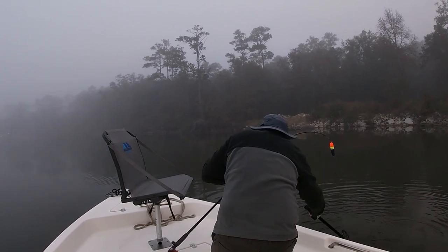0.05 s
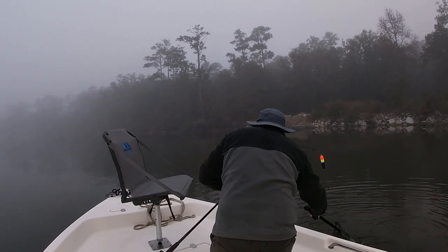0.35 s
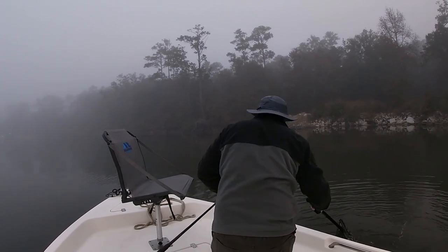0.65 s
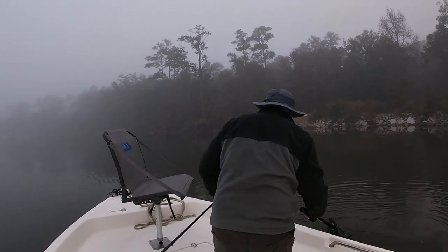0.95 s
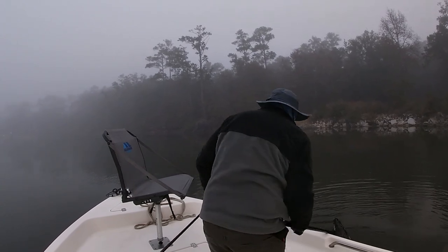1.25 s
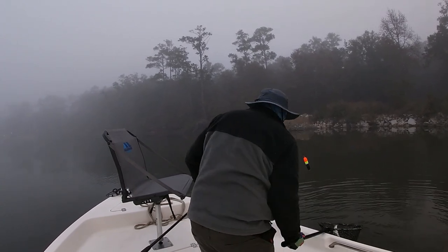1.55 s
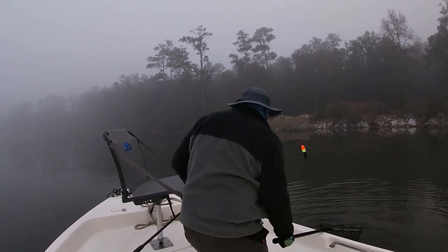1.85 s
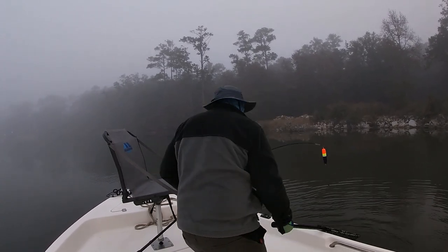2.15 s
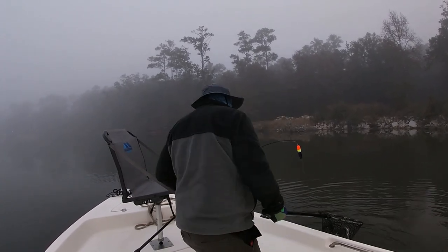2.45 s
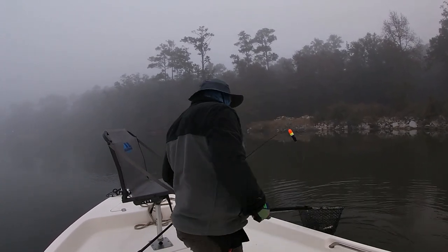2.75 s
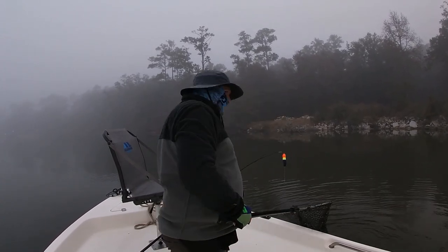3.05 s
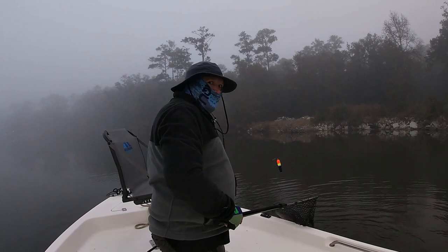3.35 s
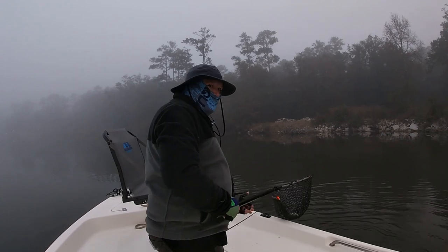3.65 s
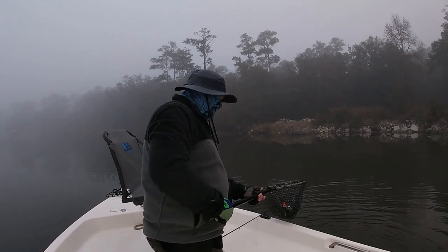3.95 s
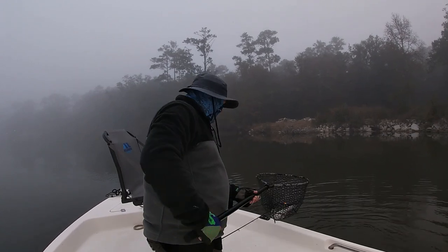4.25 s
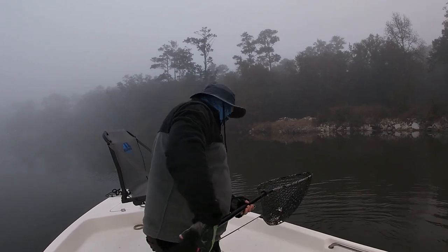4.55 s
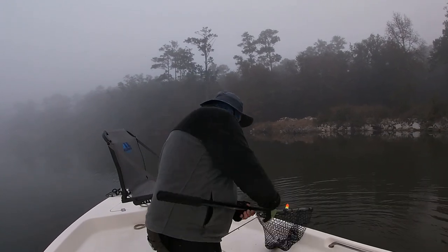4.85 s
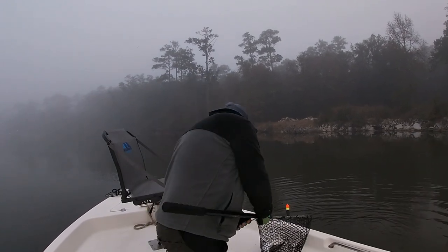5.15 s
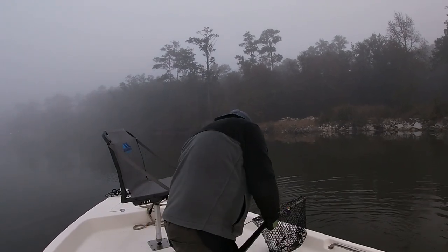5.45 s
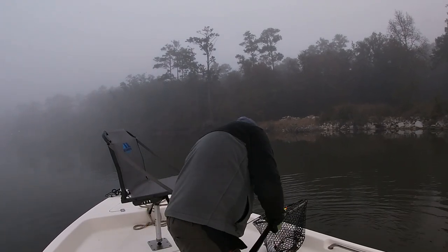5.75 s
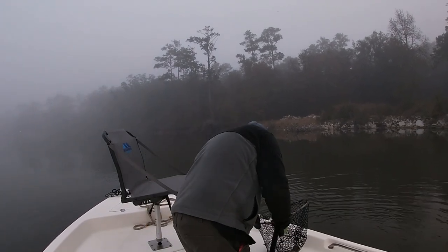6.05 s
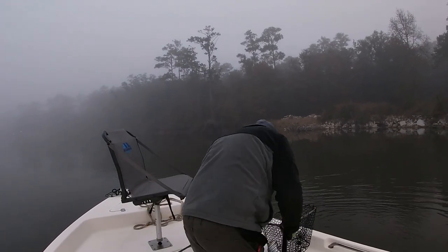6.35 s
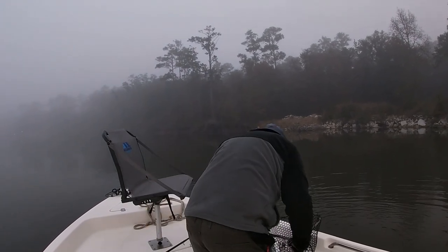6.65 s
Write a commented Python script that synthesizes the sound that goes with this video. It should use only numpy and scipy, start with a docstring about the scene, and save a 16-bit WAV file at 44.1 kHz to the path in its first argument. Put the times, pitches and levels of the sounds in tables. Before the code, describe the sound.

Quiet outdoor air, soft lapping and a faint small motor hum run throughout. At about 0.4 seconds water trickles from a lifted landing net, with bubbly plinks, one louder near 0.7, drying up soon after one second. At 1.2 gear knocks sharply on the hollow boat hull and a rubber sole squeaks. Faint drips and rustling of cloth and mesh follow, with a soft bump near 2.2 and a barely audible distant bird near 2.7. From 3.5 to 4.3 comes the loudest part: a netted fish thrashes against the hull with knocks and rumble, while net frame and tackle clack and rebound close by. Lighter clacks continue until a heavy, dull thump at 5 seconds. Sparse clicks and soft rustling follow, with two softer thumps around 6.4 and a couple of very faint bird chirps near the end.

```python
"""A netted fish thrashes against the hollow hull of a small boat, driving its modes into knocks and rumble.
Feet and gear thump the same hull; net frame and tackle clack and rebound. Earlier, as the angler lifts
the landing net, water drains from the mesh, its drops trap ringing bubbles, and late drips tick on water
and deck. A rubber sole squeaks, cloth and mesh rustle by friction, and a distant bird chirps. Under it
all are the quiet air of the river, water lapping at the boat and the hum of a small motor."""
import sys
import numpy as np
from scipy import signal
from scipy.fft import rfft, irfft
from scipy.io import wavfile

SR = 44100
rng = np.random.default_rng(int(sys.argv[2]) if len(sys.argv) > 2 else 0)


def unload_wav(signal):
    """Save mono or channel-first audio to the path in sys.argv[1] as 16-bit WAV at rate SR, clipped to [-1, 1]."""
    wavfile.write(
        sys.argv[1],
        SR,
        np.round(np.clip(np.atleast_2d(signal).T, -1, 1) * 32767).astype(np.int16),
    )


N = 305172
TIME = np.arange(N) / SR
HZ = np.fft.rfftfreq(8192, 1 / SR)


def amp(db):
    """Amplitude ratio of a level in decibels."""
    return 10 ** (np.asarray(db) / 20)


def unit_rms(x):
    """Normalisation to unit mean power."""
    return x / np.sqrt(np.mean(x ** 2) + 1e-20)


def spectrum(points, hz=HZ):
    """Interpolation on a logarithmic frequency axis."""
    f, value = np.transpose(points)
    return np.interp(np.log(hz + 1), np.log(f + 1), value)


def envelope(curve):
    """Amplitude envelope of a level curve."""
    return amp(np.interp(TIME, *np.transpose(curve)))


def gated(curve):
    """Amplitude envelope, silent outside the curve's span."""
    return envelope(curve) * (TIME >= curve[0][0]) * (TIME <= curve[-1][0])


def add(mix, onset, sound):
    """Superposition of a sound from its onset in seconds."""
    part = mix[max(round(onset * SR), 0):][:len(sound)]
    part += sound[:len(part)]


def decay(t, t60):
    """Exponential damping: 60 dB in t60 seconds."""
    return np.exp(-np.log(1000) * t / np.maximum(t60, 1e-3))


def colour(x, db):
    """Minimum-phase filter of unit energy, shaped by db over HZ."""
    log_gain = np.log(amp(np.maximum(db - db.max(), -100)))
    log_response = np.conj(signal.hilbert(np.r_[log_gain, log_gain[-2:0:-1]]))
    taps = np.fft.ifft(np.exp(log_response)).real[:len(HZ)]
    return signal.oaconvolve(x, taps / np.linalg.norm(taps))[:len(x)]


def band(centre_hz, db_per_octave2):
    """Band-pass response in dB: a parabola, flat beyond two octaves."""
    return -db_per_octave2 * np.minimum(np.log2((HZ + 1) / centre_hz) ** 2, 4)


def resonance(hz, width_hz=750):
    """Lorentzian resonance curve of height 1."""
    return 1 / (1 + (2 * (HZ - hz) / width_hz) ** 2)


def wander(rate_hz, size=N):
    """Random fluctuation: low-pass noise of unit rms."""
    f = np.fft.rfftfreq(N, 1 / SR)
    return unit_rms(irfft(rfft(rng.standard_normal(N)) / (1 + (f / rate_hz) ** 4), N))[:size]


def scattered(x, t60, db):
    """Diffuse reflection from deck and banks adds a short echo."""
    t = np.arange(SR // 2) / SR
    echo = rng.standard_normal(len(t)) * decay(t, t60)
    return x + amp(db) * signal.oaconvolve(x, echo / np.linalg.norm(echo))[:N]


def glides(notes, jitter):
    """Frequency-modulated tones; a bend under 1 glides early, over 1 late."""
    out = np.zeros(N)
    for onset, length, start_hz, end_hz, db, bend in notes:
        u = np.linspace(0, 1, int(length * SR))
        hz = (start_hz + (end_hz - start_hz) * u ** bend) * (1 + jitter * wander(900, len(u)))
        tone = np.sin(2 * np.pi * np.cumsum(hz) / SR)
        add(out, onset, amp(db) * tone * signal.windows.tukey(len(u), .5))
    return out


# Spectral density of still air: f/Hz, relative level/dB
AIR_SPECTRUM = [(12, -37.5), (20, -4.5), (53, -7.5), (134, -1), (270, -4.5), (347, -3.5), (485, -11),
                (558, -9), (624, -11.5), (923, -21), (1660, -23.5), (1960, -31), (3200, -33), (4420, -37.5),
                (6500, -38.5), (8200, -39), (10000, -49.5), (12500, -60.5), (16000, -80.5)]

def air():
    """Ambient noise: stationary, with most of its power at low frequencies."""
    return amp(-49) * colour(rng.standard_normal(N), spectrum(AIR_SPECTRUM))


# Swell of the lapping: t/s, relative level/dB
LAPPING = [(0, -43), (.8, -57), (1.9, -48.5), (2.25, -42.5), (2.7, -47.5), (3.4, -38), (4.3, -47),
           (5.25, -35.5), (5.55, -64.5), (6.2, -44), (6.92, -55)]
# Its spectrum: f/Hz, relative level/dB
LAP_SPECTRUM = [(20, -25), (50, -5), (110, 2.5), (300, -2), (450, -17), (800, -14), (2000, -35),
                (6000, -65)]

def lapping():
    """Amplitude modulation: low water noise under the hull swells as the boat rocks."""
    water = colour(rng.standard_normal(N), spectrum(LAP_SPECTRUM))
    return envelope(LAPPING) * water * amp(1.05 * wander(2.4) - 6.5)


# Upper motor tones: f/Hz, relative level/dB
MOTOR_TONES = [(140, -56), (264, -59), (322, -58), (361, -55.5), (402, -56.5), (564, -55.5), (1690, -72.5)]
# Lowest motor tone: t/s, relative level/dB
MOTOR_DRONE = [(0, -47), (2.7, -45), (3.4, -57), (6.92, -55.5)]

def motor(drone_hz=65.4):
    """A line spectrum: each tone of the small motor wavers in frequency and amplitude."""
    def tone(hz):
        phase = 2 * np.pi * np.cumsum(hz + 2.586 * wander(8.41)) / SR
        return np.sqrt(2) * np.sin(phase) * amp(2.4 * wander(10.6))
    hum = sum(amp(db) * tone(hz) for hz, db in MOTOR_TONES)
    return amp(-4) * (hum + envelope(MOTOR_DRONE) * tone(drone_hz))


# Distinct hull modes: f/Hz, relative level/dB, nominal T60/s
HULL_MODES = [(74, -3.5, 0.58), (98, 0, 0.54), (144.8, 4, 0.59), (197.2, 4.5, 0.67), (204.4, -0.5, 0.29),
              (298, -10.5, 0.63), (368.3, 2, 0.32), (405, 6, 0.16), (524, -4, 0.31), (551, 4.5, 0.24),
              (605.5, 1.5, 0.29), (672.3, 3, 0.19), (737.5, 1, 0.28), (930, 1.5, 0.28), (1015, 7, .12),
              (1105, 6, 0.11), (1264, 4, 0.13), (1542, 5, 0.19)]
# Damping of the dense modes: f/Hz, nominal T60/s
DENSE_T60 = [(60, 1), (200, 0.76), (600, 0.087), (1500, 0.0866), (5000, 0.225)]
# Their spectrum: f/Hz, relative level/dB
DENSE_SPECTRUM = [(20, -42.5), (50, -8), (130, -9.5), (400, -1.5), (1000, 0), (1400, -1.5), (2500, -1.5),
                  (6000, -56), (9000, -23.5), (14000, -53.5)]

def dense_modes(ring, size):
    """Modal overlap: countless close modes merge into noise, each band with its own damping."""
    hz, t, bands = signal.stft(rng.standard_normal(size), SR, nperseg=256)
    t60 = ring * spectrum(DENSE_T60, hz)
    return signal.istft(bands * decay(t, t60[:, None]), SR, nperseg=256)[1][:size]


def hull_response(corner_hz, boom_db, ring, dense_db):
    """Modal superposition: a soft blow excites only low modes, a heavy one booms in the cavity."""
    t = np.arange(SR // 2) / SR
    hz, mode_db, t60 = np.transpose(HULL_MODES)
    force_db = -10 * np.log10(1 + (HZ / corner_hz) ** 4.02) + boom_db / (1 + (HZ / 220) ** 4)
    shares = amp(mode_db + np.interp(hz, HZ, force_db) + 2.05 * rng.standard_normal(len(hz)))
    shares *= rng.choice([-1, 1], len(hz)) / np.linalg.norm(shares)  # the spot struck sets the signs
    modes = shares @ (np.sin(2 * np.pi * hz[:, None] * t) * decay(t, ring * t60[:, None]))
    dense = dense_modes(ring, len(t)) * (1 + amp(-24.5) * decay(t, 0.017))
    return amp(2.5) * modes + amp(dense_db) * colour(dense, spectrum(DENSE_SPECTRUM) + force_db)


# Deck panel modes: f/pitch, relative level/dB
PANEL_MODES = [(0.489, -9), (0.998, -1), (1.178, -0.5), (1.57, -6.5)]

def panel(pitch_hz, panel_db, knock_hz, knock_db, ring):
    """Damped plate vibration: the panel booms and the struck spot gives a short two-mode knock."""
    t = np.arange(SR // 2) / SR
    def mode(hz, cycles):
        return np.sin(2 * np.pi * hz * t) * decay(t, cycles / hz)
    boom = sum(amp(db + panel_db) * mode(ratio * pitch_hz, ring * 75.6) for ratio, db in PANEL_MODES)
    knock = mode(knock_hz, cycles=46) + amp(-4) * mode(1.57 * knock_hz, cycles=46)
    return (boom + amp(knock_db) * knock) * (1 - np.exp(-t / 0.0019))


# Blows on the hull: t/s, level/dB, corner f/Hz (hardness), cavity boom/dB, ring time factor,
# panel f/Hz, panel level/dB, knock f/Hz, knock level/dB
BLOWS = [(0.06, -43, 204, 13, 0.59, 161.6, 1, 110, -7), (1.233, -22, 1110, -14, 0.69, 169.8, 4.5, 533, 4.5),
         (1.2421, -23.5, 900, -6.5, 0.62, 235, -27, 856, -3),
         (1.2756, -30, 220, 10, 0.74, 152.6, 8, 156, -4), (2.135, -42, 312, -4, 0.42, 191, 2, 157, -12),
         (2.252, -40, 690, 12, 0.28, 289, 13.5, 381, 5), (3.399, -37, 224, 13, 1.3, 136, -14, 118, -9),
         (3.488, -32.5, 2140, 8, 1.1, 132, -9, 1200, 4.5), (3.5728, -15.5, 1330, 2, 1.1, 149.7, -4, 386, 1),
         (3.578, -21.5, 800, 6, 0.56, 188, 2.5, 615, 11), (3.620, -26.5, 800, 3, 1.2, 122.5, 1.5, 371, 3),
         (3.664, -24.5, 1210, 11.5, 1, 139, -7.5, 608, -1), (3.705, -32, 600, -7, 0.84, 112.6, 0, 396, 9.5),
         (3.752, -34, 1590, -9, 1.1, 194, -23, 945, 14),
         (3.7844, -28.5, 1830, 4, 0.56, 198.5, -22, 992, 10),
         (3.811, -31.5, 1700, -2, .8, 149, -8, 983, 10), (3.825, -33, 1786, -11.5, 0.97, 241, -3, 946, 11),
         (3.841, -32.5, 2000, -3, 0.63, 174, -11, 1550, 7),
         (3.902, -26.5, 1870, 1, 1.58, 239.3, -4, 953, 8.5),
         (4.028, -34.5, 1455, 11, 2.1, 146.7, 2.5, 982, 11.5),
         (4.059, -28, 1400, -3, 0.77, 234.6, 1, 567, 8), (4.07, -33.5, 1200, -8, 0.47, 265, 5, 375, 7),
         (4.123, -30.5, 1040, 3, 1, 148.2, -2.5, 400, -4),
         (4.9581, -20.5, 290, 9.5, 0.67, 214.8, 6.5, 109, 0), (4.986, -25.5, 200, 8, 0.34, 223, 6, 218, -8),
         (5.034, -30.5, 180, -3, 0.55, 108.2, 5, 99, -1),
         (5.183, -44.5, 667, -10, 1.16, 184.2, 8.5, 524, -2),
         (6.3428, -31, 300, -5.5, 0.7, 276.4, 4, 147, -17),
         (6.409, -36, 355, -8.5, 0.63, 265.3, 6, 191, -8)]

def thumps():
    """Impact excitation: feet, gear and the thrashing fish's slaps ring the whole hull and the panel they
    strike."""
    out = np.zeros(N)
    for onset, db, corner_hz, boom_db, ring, pitch_hz, panel_db, knock_hz, knock_db in BLOWS:
        body = hull_response(corner_hz, boom_db, ring, dense_db=-1)
        add(out, onset, amp(db) * (body + panel(pitch_hz, panel_db, knock_hz, knock_db, ring)))
    return out


def drainage(lift_s=0.414, rise_s=0.058, drain_s=0.58, dry_s=0.42, spurt_gap_s=0.1218):
    """Decaying flow: the lifted mesh swings, sheds water in regular spurts and runs dry."""
    t = np.maximum(TIME - lift_s, 0)
    spurts_db = 2.5 * np.cos(2 * np.pi * (TIME - 0.486) / spurt_gap_s)
    rise = np.minimum(t / rise_s, 1)
    drying = np.clip(1 - (t - drain_s) / dry_s, 0, 1)
    return amp(-50.5 - 5 * t + spurts_db) * rise * drying


# Spectrum of trickling water: f/Hz, relative level/dB
WATER_SPECTRUM = [(400, -5.5), (1000, 2), (1700, -8), (3000, -8), (4400, -11.5), (7800, -15), (9900, -20),
                  (11500, -31.5), (13500, -32), (16000, -44.5)]

def trickle(flow):
    """Incoherent summation: many tiny bubbles and fine spray, in proportion to the flow."""
    t, bubbles = np.arange(SR // 100) / SR, np.zeros(N)
    for hz in np.geomspace(1400, 11000, 24):
        births = rng.random(N) < 18 / SR
        strengths = amp(2.4 * np.minimum(rng.exponential(1, N), 3.5)) * np.sqrt(hz)
        bubble = np.sin(2 * np.pi * hz * (t + 12 * t ** 2)) * np.exp(-t * hz / 7.5)
        bubbles += signal.oaconvolve(births * strengths, bubble)[:N]
    spray = rng.standard_normal(N) * amp(3.02 * wander(54))
    return flow * unit_rms(colour(unit_rms(bubbles) + spray, spectrum(WATER_SPECTRUM)))


# Loudest drops from the net: t/s, peak level/dB, f/Hz
DROPS = [(.4605, -40, 2500), (.4838, -32, 3020), (.4975, -37, 2120), (.5035, -38, 1500), (.5555, -38, 2540),
         (.5819, -33, 1600), (.597, -38, 1790), (.613, -31, 2740), (.6735, -37, 1580), (.7273, -16.5, 2840),
         (.8367, -38, 1870), (.915, -40, 2210), (.9735, -31.5, 2620), (.987, -31, 2830)]

def drops(flow, small_per_s=70, small_hz=1820, bubble_cycles=32):
    """Bubble resonance: each drop ticks on the surface and traps air that rings with rising pitch."""
    out, t = np.zeros(N), np.arange(SR // 12) / SR
    falls = np.flatnonzero((rng.random(N) < small_per_s / SR) & (flow > 0))
    pitch = small_hz * 2 ** (0.496 * rng.standard_normal(N))
    small = [(i / SR, 20 * np.log10(flow[i]) + 5.5, pitch[i]) for i in falls]
    noise = rng.standard_normal(N + len(t))
    attack = 1 - np.exp(-t / 0.0001)
    tick_and_tail = amp(-25) * decay(t, 0.0057) + amp(-33.5) * decay(t, 0.19)
    for onset, db, hz in list(DROPS) + small:
        bubble = np.sin(2 * np.pi * hz * (t + 6 * t ** 2)) * decay(t, bubble_cycles / hz) * attack
        spray = colour(noise[round(onset * SR):][:len(t)], band(hz, 6.9)) * tick_and_tail
        add(out, onset, amp(db) * (bubble + spray))
    return out


# Splashes and scrapes: t/s, duration/s, level/dB, centre f/Hz
SWISHES = [(0.506, 0.0052, -39.5, 6600), (0.523, 0.0036, -38, 5450), (0.684, 0.0052, -45.5, 6000),
           (0.587, 0.025, -49.5, 4140), (0.759, 0.004, -44, 4000), (0.763, 0.0053, -39.5, 4020),
           (0.863, 0.0044, -41.5, 5500), (1.1, 0.012, -43, 6440), (1.281, 0.032, -37.5, 3220),
           (2.216, 0.047, -45, 4400)]

def swishes():
    """Band-limited noise bursts: wet mesh splashes or a shoe slides."""
    out = np.zeros(N)
    for onset, length, db, centre_hz in SWISHES:
        size = int(max(length, .004) * SR)
        rub = rng.standard_normal(size) * amp(3.5 * wander(220, size)) * signal.windows.tukey(size, .2)
        shape_db = spectrum(WATER_SPECTRUM) + band(centre_hz, 2.54)
        add(out, onset, amp(db) * colour(np.r_[rub, np.zeros(SR // 100)], shape_db))
    return scattered(out, t60=0.17, db=-5)


# Slips of the sole: t/s, duration/s, start f/Hz, end f/Hz, level/dB, bend
SQUEAKS = [(1.2755, .011, 3100, 2400, -27, .7), (1.2865, .013, 2200, 1750, -34, .7),
           (1.2885, .013, 4100, 2600, -24.5, .7), (1.300, .012, 2800, 2500, -34, 1),
           (1.280, .015, 7300, 5400, -32, .8), (1.02, .03, 5900, 5700, -54, 1),
           (2.245, .045, 3600, 8600, -49, 1)]

def sole():
    """Stick-slip friction: a rubber sole gives short, rough, gliding tones."""
    return scattered(glides(SQUEAKS, jitter=.045), t60=.07, db=-8)


# Resonances of the wet net frame: f/Hz, bandwidth/Hz, relative level/dB
FRAME_MODES = [(2074, 155, -6.5), (2850, 160, -8.5), (3210, 160, -9), (4730, 210, -12.5), (5580, 480, -6)]
# Broad spectrum of a clack: f/Hz, relative level/dB
CLACK_SPECTRUM = [(200, -6.5), (1000, 0), (2000, -0.5), (2650, 0.5), (3800, 5.5), (6000, -2), (8100, -3),
                  (9000, -14.5), (11200, -24), (13000, -29.5), (16000, -44)]
GRIP_DETUNE, GRIP_DB = .025, 4  # spread of frequency and level from clack to clack

def frame_response_db():
    """Resonance and interference: grip shifts the frame's modes; a deck echo ripples the spectrum."""
    shifts = rng.standard_normal((len(FRAME_MODES), 2))
    peaks = sum(amp(db + GRIP_DB * gain) * resonance(hz * (1 + GRIP_DETUNE * detune), width)
                for (hz, width, db), (gain, detune) in zip(FRAME_MODES, shifts))
    echo_s = .0007 * rng.uniform(0.502, 2.005)
    ripple_db = 3.5 * np.cos(2 * np.pi * HZ * echo_s)
    return spectrum(CLACK_SPECTRUM) + 20 * np.log10(1 + 1.53 * peaks) + ripple_db


# Clacks of net frame and tackle: t/s, level/dB, treble tilt/dB, first rebound/dB,
# struck part f/Hz, its boost/dB
CLACKS = [(1.2316, -25.5, 1, -25, 5660, 8), (3.488, -40.5, 0, 3.5, 1820, -12),
          (3.574, -23.5, 1.5, -8, 2360, 2), (3.6188, -15.5, 2.5, -10, 4050, 6.5),
          (3.658, -33, -1, -30, 4580, 4), (3.6649, -20.5, 2, -34, 4760, 7),
          (3.7434, -16.5, 3.5, -33, 4600, 5.5), (3.777, -31.5, 6.5, -31, 7500, -1.5),
          (3.785, -29.5, -8, -25, 2030, 10), (3.823, -29, -5, -20, 2000, -3),
          (3.898, -18.5, 1, -5.5, 3370, 6.5), (3.9137, -26, -2, -18, 3210, 9),
          (3.926, -23.5, -0.5, -13, 4200, -2), (3.967, -35, -0.5, -36, 3540, 9),
          (4.027, -21, 1, -7.5, 3970, 6.5), (4.052, -31.5, 1, -22, 3570, 0), (4.071, -37, -3, -25, 4600, 3),
          (4.111, -27.5, 0.5, -33, 3350, 6), (4.1222, -25.5, 0.5, -10.5, 4200, 5),
          (4.172, -38, -2, -12, 3460, 0), (4.2136, -28.5, 0, -25, 4270, -1),
          (4.277, -43.5, 0, -38, 5070, 7), (4.4913, -42.5, -4.5, -4.5, 3320, 4),
          (4.565, -43, -3.5, -2, 2870, 3.5), (4.609, -38, -2.5, -16, 2850, 0),
          (4.669, -34.5, 0, -30, 3460, 6.5), (4.7224, -39.5, -0.5, -13, 2850, 5),
          (4.7842, -29.5, -0.5, -7.5, 3330, 7), (4.8108, -38.5, -8.5, -11, 3460, -1),
          (4.956, -35, 0.5, -19, 3080, 4), (5.008, -44, 6, -2, 7800, 8), (5.184, -38.5, -3.5, -16, 2830, 5),
          (5.2024, -43.5, -4.5, -14, 3200, -6), (5.288, -45.5, -4, -15, 2780, 7),
          (5.737, -46.5, -1.5, -5.5, 3560, 5), (5.837, -40, 2, -23, 3340, 3.5),
          (6.19, -41.5, -1.5, -12, 2780, 4), (6.24, -50, -2, -20, 3430, 10)]

def clacks(rebound_gap_s=.008, rebound_loss_db=3, handle_hz=3425):
    """Inelastic collision: a crack and weakening rebounds; frame, struck part and handle tube ring."""
    out, t = np.zeros(N), np.arange(SR // 4) / SR
    tilt = np.tanh(np.log2((HZ + 1) / 4300)) / 0.52
    contact = decay(t, 0.03) + .8 * decay(t, 0.006)
    for onset, db, tilt_db, rebound_db, part_hz, part_db in CLACKS:
        crack, tail = rng.standard_normal((2, len(t)))
        contacts = contact.copy()
        for k, delay in enumerate(rebound_gap_s * np.cumsum(rng.uniform(.7, 1.4, size=4))):
            add(contacts, delay, amp(rebound_db - k * rebound_loss_db) * contact)
        drive = crack * contacts + amp(-12) * tail * decay(t, 0.12)
        clack = colour(drive, frame_response_db() + tilt_db * tilt + part_db * resonance(part_hz))
        gripped_hz = handle_hz * (1 + GRIP_DETUNE * rng.standard_normal())
        handle = amp(-20) * np.sin(2 * np.pi * gripped_hz * t) * decay(t, 0.07)
        add(out, onset, amp(db) * (clack / np.std(clack[:SR // 250]) + handle))
    return out


# Rustle as the fish is lifted, then brought aboard: t/s, relative level/dB
LIFTING = [(1.4, -61.5), (2.12, -61), (2.36, -61.5), (2.55, -64), (3.0, -60), (3.45, -60)]
BOARDING = [(4.3, -63), (4.7, -58.5), (4.79, -72), (4.92, -68.5), (5.15, -55.5), (5.28, -66.5), (6.09, -76),
            (6.31, -67.5), (6.9, -73.5)]
# Broad spectrum shared by rustle, drips and brushes: f/Hz, relative level/dB
HISS_SPECTRUM = [(400, -15.5), (1000, 5.5), (3000, 3), (5000, -3.5), (8000, -7), (9900, -12.5),
                 (11500, -25), (14000, -30), (15500, -48)]

def rustle(catches_per_s=130):
    """Sliding friction: jacket and net hiss softly and catch in tiny dry snaps."""
    catches = (rng.random(N) < catches_per_s / SR) * amp(5 * np.minimum(rng.exponential(1, N), 3))
    snap = decay(np.arange(SR // 40) / SR, 0.005)
    snaps = signal.oaconvolve(catches, snap)[:N] * rng.standard_normal(N)
    slide = rng.standard_normal(N) * amp(2 * wander(34))
    motion = amp(0.5) * envelope(np.vstack([LIFTING, BOARDING])) * (TIME > LIFTING[0][0])
    return motion * unit_rms(colour(0.79 * unit_rms(snaps) + slide, spectrum(HISS_SPECTRUM)))


# Drips from the raised net, with a few faint clacks: t/s, level/dB, ring f/Hz
DRIPS = [(1.657, -50, 2660), (1.7016, -51.5, 8100), (1.909, -45, 2040), (1.917, -45.5, 1760),
         (2.0703, -45, 3680), (2.0945, -43.5, 2520), (2.3033, -43.5, 3050), (2.4274, -50, 4130),
         (2.4936, -42.5, 3200), (2.5163, -44, 3430), (2.5622, -48.5, 3400), (2.809, -47.5, 3050),
         (2.882, -50, 6600), (2.922, -47, 2100), (3.106, -52, 5700), (3.281, -46, 3100),
         (3.302, -49.5, 6950), (4.629, -51, 3400), (5.103, -45.5, 3490)]

def drips():
    """Transient excitation: drips tick on water and deck, a few faint clacks follow; each rings briefly."""
    out, t = np.zeros(N), np.arange(SR // 20) / SR
    for onset, db, hz in DRIPS:
        shape_db = spectrum(HISS_SPECTRUM) + 12.5 * resonance(hz) + band(7500, 1.9)
        tick = colour(rng.standard_normal(len(t)) * decay(t, 0.023), shape_db)
        add(out, onset, amp(db) * tick / np.std(tick[:SR // 250]))
    return scattered(out, t60=0.084, db=-6)


# Bird notes: t/s, duration/s, start f/Hz, end f/Hz, level/dB, bend
BIRD_NOTES = [(2.715, .19, 3340, 3020, -63, 4), (6.12, .042, 3450, 2700, -64.5, 1.4),
              (6.853, .056, 3460, 2350, -61.5, 3.6)]

def bird():
    """Frequency modulation: a distant bird's whistles fall in pitch."""
    return scattered(glides(BIRD_NOTES, jitter=.032), t60=.2, db=-8)


# Strokes of sleeve on mesh: t/s, duration/s, level/dB, centre f/Hz
BRUSHES = [(2.873, 0.17, -60, 5330), (3.221, 0.12, -57.5, 5870), (5.516, 0.2, -59.5, 5100)]

def brushes():
    """Friction noise: a band of hiss swells and fades with each smooth stroke."""
    out = np.zeros(N)
    for onset, length, db, centre_hz in BRUSHES:
        u = np.linspace(0, 1, int(length * SR))
        hiss = colour(rng.standard_normal(len(u)), spectrum(HISS_SPECTRUM) + band(centre_hz, 8.1))
        add(out, onset, amp(db) * np.sin(np.pi * u) * hiss)
    return out


# Flapping of the netted fish against the side: t/s, level/dB
THRASH = [(3.57, -26.5), (3.65, -37), (3.85, -26.5), (3.99, -44), (4.06, -54), (4.2, -42), (4.4, -72)]

def fish_flaps(flaps_per_s=110, spots=6):
    """A Poisson train of impacts: the fish strikes hull and side panel at spots of varied hardness."""
    flaps = np.zeros(N)
    for corner_hz in 1103 * np.geomspace(.65, 1.7, spots):
        hits = (rng.random(N) < flaps_per_s / spots / SR) * rng.uniform(.5, 1, N)
        body = hull_response(corner_hz, boom_db=-3.5, ring=0.81, dense_db=-6)
        side = panel(pitch_hz=267, panel_db=-14, knock_hz=0.28 * corner_hz, knock_db=-4, ring=0.24)
        flaps += signal.oaconvolve(hits, body + side)[:N]
    return gated(THRASH) * unit_rms(flaps)


# Rumble of the hull under the fish: t/s, level/dB
RUMBLE = [(3.57, -49), (3.62, -31.5), (3.72, -33.5), (3.85, -32.5), (3.98, -39), (4.08, -29.5), (4.18, -48),
          (4.3, -51), (4.42, -84)]

def hull_rumble():
    """Forced vibration: the writhing fish drives the hull's modes with a random force."""
    response = hull_response(corner_hz=650, boom_db=-6, ring=0.78, dense_db=-8)
    return gated(RUMBLE) * unit_rms(signal.oaconvolve(rng.standard_normal(N), response)[:N])


def scene():
    """Linear superposition of all sources aboard and around the boat."""
    high_pass = signal.butter(2, 38, "high", fs=SR, output="sos")
    hull = signal.sosfilt(high_pass, thumps() + fish_flaps() + hull_rumble())
    flow = drainage()
    flung_spray = amp(-20) * gated(THRASH)
    water = trickle(flow + flung_spray) + drops(flow) + swishes()
    angler_and_net = sole() + clacks() + rustle() + drips() + brushes()
    return air() + lapping() + motor() + hull + water + angler_and_net + bird()


def record(dry):
    """Mid-side stereo: delayed top treble and faint hiss form the side; both channels are low-passed."""
    high_pass = signal.firwin(63, 11800, pass_zero=False, window=("kaiser", 8), fs=SR)
    low_pass = signal.firwin(255, 15300, window=("kaiser", 9), fs=SR)
    top = signal.oaconvolve(dry, high_pass, "same")
    side = amp(-1) * np.r_[np.zeros(SR // 2000), top][:N] + amp(-104) * rng.standard_normal(N)
    return signal.oaconvolve(np.array([dry + side, dry - side]), low_pass[None], "same")


dry = scene()
out = record(dry)
unload_wav(out)
```